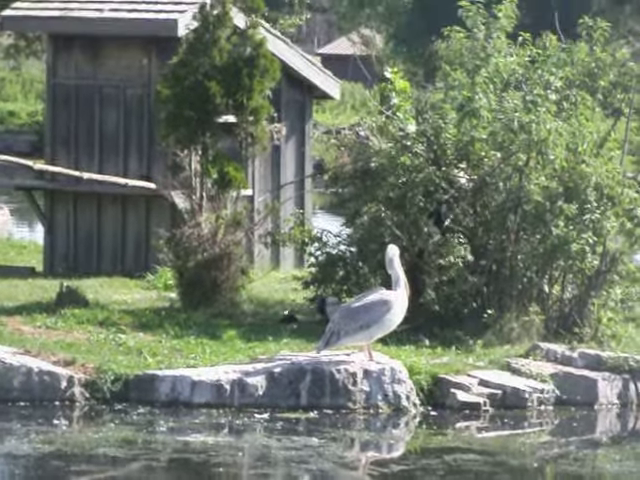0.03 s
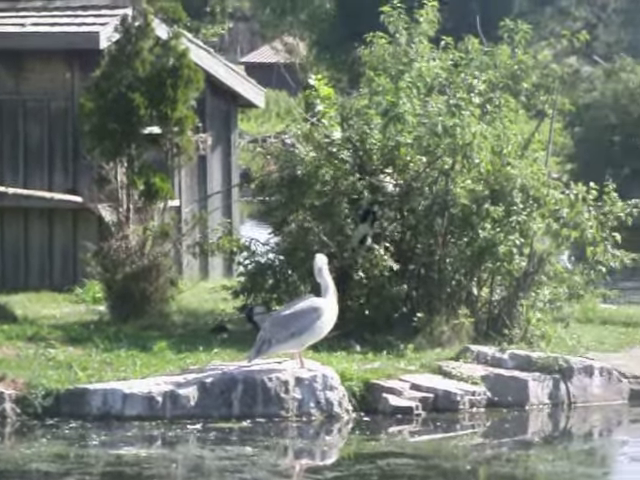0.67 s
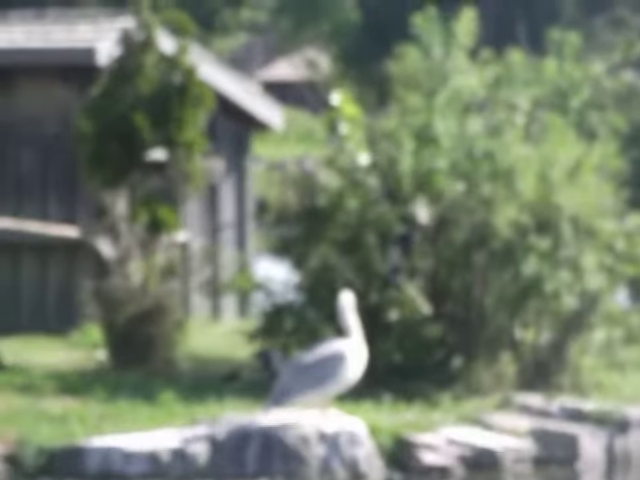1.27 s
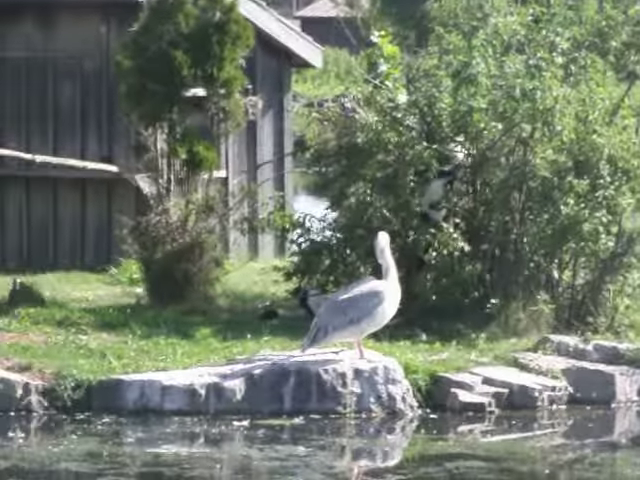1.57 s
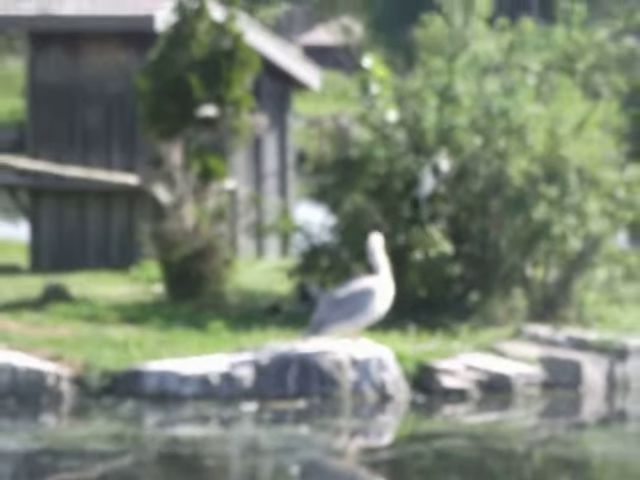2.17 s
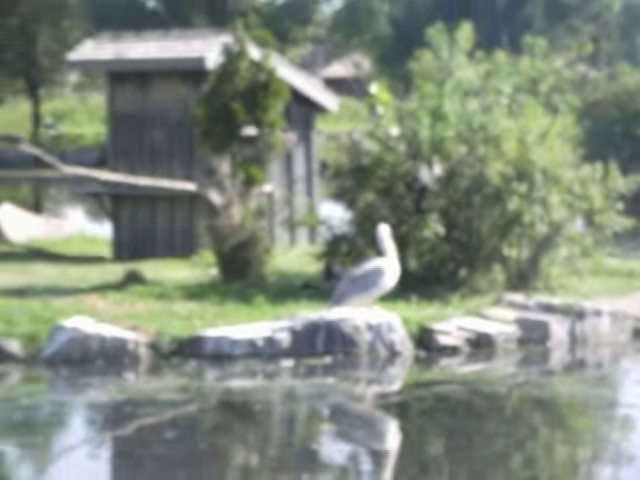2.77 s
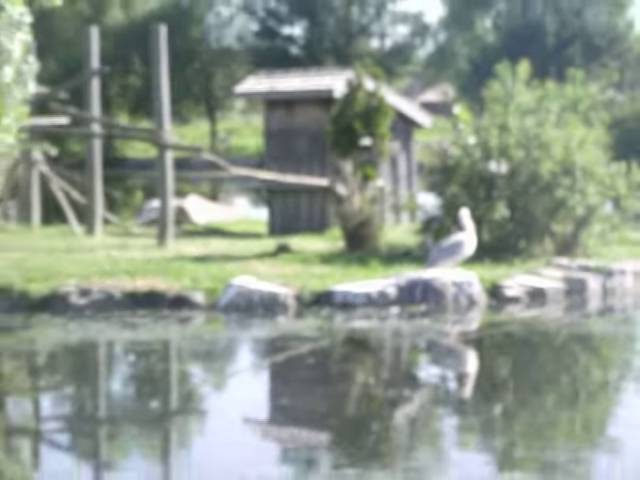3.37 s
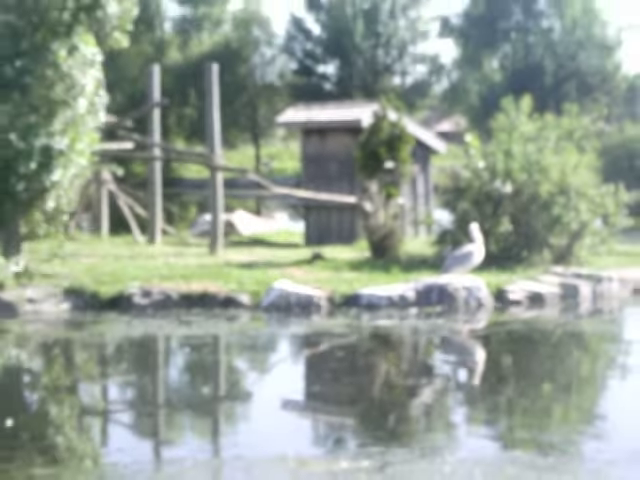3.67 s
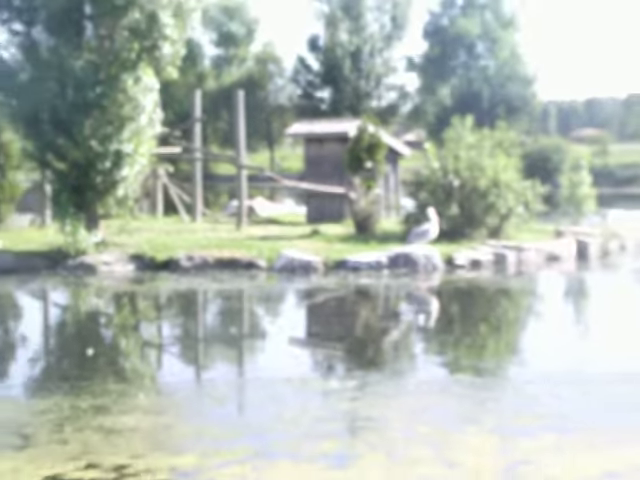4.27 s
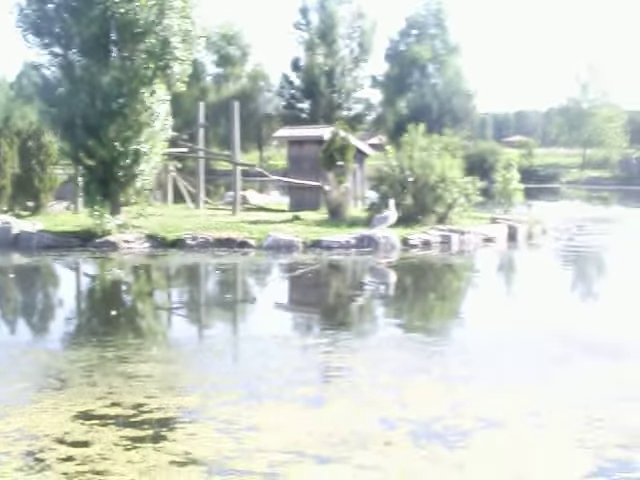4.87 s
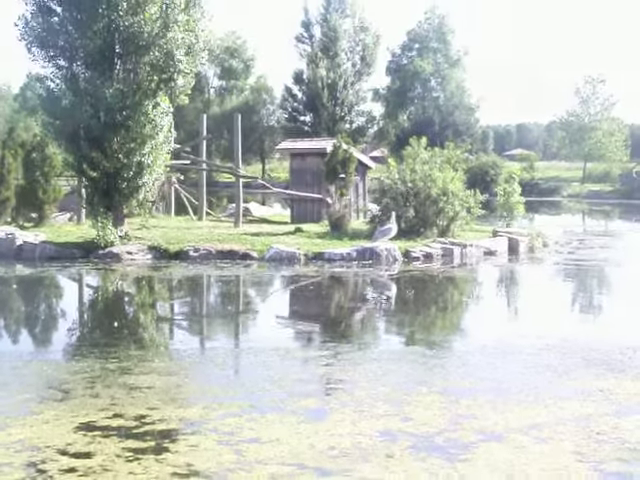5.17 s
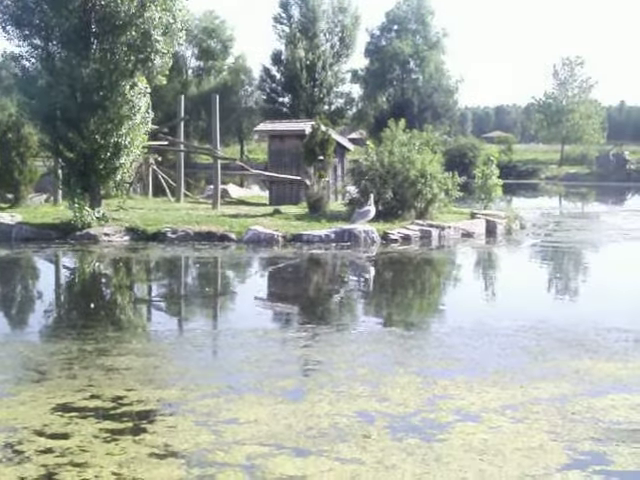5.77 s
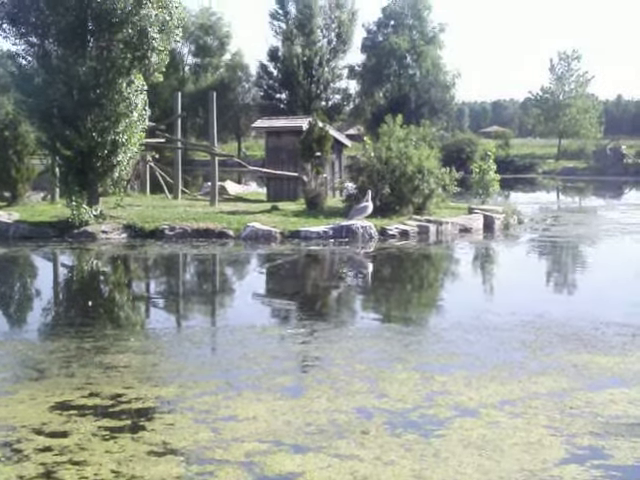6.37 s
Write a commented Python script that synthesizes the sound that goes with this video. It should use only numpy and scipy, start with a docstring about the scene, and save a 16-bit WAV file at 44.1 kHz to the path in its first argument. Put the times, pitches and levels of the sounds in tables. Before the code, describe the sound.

A tiny zoom motor buzzes right by the built-in microphone of a hand-held camera, first in a short burst between clicks, then in a longer, rising run of scraping gears with some dull knocks. Two sharp clacks and a quick squeak come after it stops, and two faint chirps sound far off. Low hum, gentle hiss and light finger noises continue throughout in the quiet outdoor setting.

```python
"""Beside a quiet pond, on the built-in microphone of a hand-held camera, which hears its own body.
A low throbbing hum, soft hiss and small handling ticks lie under everything. At 1 s the lever clicks
and the lens zooms in briefly: each motor step jerks the gears, knocks the case and ends in a scrape.
From 1.8 s it zooms all the way out, whirring louder, with a few dull knocks and at last a thin whine.
Near 4.7 s it stops; two clacks and a squeak follow, then two faint chirps far off."""
import sys
import numpy as np
from scipy import signal
from scipy.fft import rfft, irfft
from scipy.io import wavfile

SR = 44100
rng = np.random.default_rng(int(sys.argv[2]) if len(sys.argv) > 2 else 0)


def master(y):
    """Save y as 16-bit WAV."""
    cut = np.clip(np.atleast_2d(y).T, -1, 1)
    pcm = np.round(cut * 32767)  # scale
    wavfile.write(sys.argv[1], SR, pcm.astype(np.int16))


N = 287091
TIME = np.arange(N) / SR
ZOOM_IN_S, ZOOM_OUT_S = (0.99, 1.27), (1.81, 4.66)  # the motor's start and stop
LAST_STRETCH_S = 4.16


def zoom_motor(span, load, cruise_hz, glide_hz, slide_s, grit, flutter_db, scrape_db, rasp_db,
               knock_spread_db=1, scrape_spread_db=3, reach=0.296):
    """A stepping motor and gears, right by the microphone: each step knocks, scrapes and rasps."""
    # surges of the motor: (start [s], length [s], extra step rate [Hz])
    surges = [(1.12, 0.071, 12.4), (1.87, 0.098, 20.4), (1.99, 0.39, 26.7), (2.71, .17, 27),
              (2.93, .11, 15.6), (3.36, .11, 19), (3.64, .08, 21.3), (3.89, 0.091, 10.9), (4.01, .16, 26),
              (4.17, .15, 26.7), (4.34, 0.091, 18.8), (4.45, 0.093, 23), (4.57, .14, 28)]
    # spectra of the three gear sounds, through the case: (frequency [Hz], gain [dB])
    knock_spectrum = [(250, -55.5), (500, -36.5), (730, -27), (898, -16), (960, -17.5), (1025, -12),
                      (1130, -17), (1291, -1.5), (1375, -1.5), (1500, 2), (1600, -2.5), (1690, -5),
                      (1860, -7.5), (3200, -48.5)]
    scrape_spectrum = [(1200, -19), (1950, 1.5), (2130, -5.5), (2330, -3), (3080, -6), (3300, -19),
                       (3650, -11.5), (4020, 3), (4350, -6.5), (5600, -20.5)]
    rasp_spectrum = [(1200, -32), (2100, -21.5), (2450, -5), (2720, -4), (2930, 6.5), (3080, -0.5),
                     (3280, -13.5), (3480, -16.5), (3680, -25), (4020, -14.5), (4400, -24.5), (5000, -26.5),
                     (5700, -33.5)]
    creep_hz_per_s, surge_db_per_hz = 2.2, 0.0457
    seated_s, seating_s, slack_s = 2.444, 0.16, 0.00012
    running = (TIME > span[0]) & (TIME < span[1])
    surge_hz = humps(surges, taper=0.7)
    step_hz = cruise_hz + creep_hz_per_s * (TIME - span[0]) + surge_hz
    steps = np.cumsum(step_hz * running) / SR
    # the gears pull in with play: rasping and uneven until they seat
    loose = np.clip((seated_s - TIME) / seating_s, 0, 1)
    # the pinion runs off centre: teeth that knock softly slide farther and chirp higher
    last_stretch = TIME > LAST_STRETCH_S
    wobble = np.cos(2 * np.pi * steps / np.where(last_stretch, 2, 3))  # once in two or three steps
    wobble_db = np.where(last_stretch, 3, 1) * wobble
    knocks, scrapes = np.zeros((2, N))
    for k, i in enumerate(np.flatnonzero(np.diff(np.floor(steps)))):
        late, hardness, friction, pitch = rng.standard_normal(4)
        s = TIME[i] + slack_s * (1 + loose[i]) * late
        way = (-1) ** k  # the jerks alternate, so the buzz has odd harmonics of half the step rate
        add(knocks, s, way * amp([knock_spread_db * np.tanh(hardness) - wobble_db[i]]))
        travel = 1 + reach * wobble[i] + 0.03 * pitch
        tooth_slide = glide(glide_hz[0], glide_hz[1] * travel, slide_s * travel)
        add(scrapes, s, way * amp(scrape_spread_db * friction + 2.5 * wobble[i]) * tooth_slide)
    contact = np.exp(-(steps % 1) / 0.5)
    knocks = unit(knocks) + grit * unit(contact * running * rng.standard_normal(N))
    flutter = amp(flutter_db * drift(60) + 1.3 * wobble)
    rasp = (contact + 0.41) * running * flutter * rng.standard_normal(N)
    load_db = np.interp(TIME, *np.transpose(load)) + surge_db_per_hz * surge_hz
    layers = [(colour(knocks, knock_spectrum), load_db),
              (colour(scrapes, scrape_spectrum), scrape_db + 0.89 * load_db),
              (colour(rasp, rasp_spectrum), rasp_db + 6 * loose)]
    return sum(amp(db) * x / np.std(x[running]) for x, db in layers)


def whine(hz=3226, db=-34, fade_db_per_s=22):
    """A thin tone that sets in on the last stretch and fades until the motor stops."""
    gate = humps([(LAST_STRETCH_S, ZOOM_OUT_S[1] - LAST_STRETCH_S, 1)], taper=0.1)
    level = amp(db - fade_db_per_s * np.maximum(TIME - LAST_STRETCH_S, 0))
    return gate * level * np.sqrt(2) * np.sin(2 * np.pi * hz * TIME)


def clacks_and_taps(touch_gap_s=0.0048, bounce_gap_s=0.0052):
    """Lever and lens clack, with three growing touches before and four fading bounces; the case is tapped."""
    # clacks: (time [s], level [dB], brightness [dB], body [dB], rattle [s], lead-in [dB], bounce [dB])
    clacks = [(.967, 5.5, 4.5, -11, 0.0029, -8.5, -36), (1.789, -3.5, 4.5, 1, 0.0032, -3.5, -11),
              (4.7451, 4.5, 7.5, -11, 0.00072, -21, -10), (4.9423, 5.5, -4, 20, 0.00066, -46, -32)]
    # light taps: (time [s], level [dB], brightness [dB])
    taps = [(.164, -9, 8.5), (.386, -20, -1.5), (.506, -18, 18), (0.52, -8.5, 10.5), (.552, -20, 13),
            (1.2845, -6.5, 13), (1.345, -16.5, -9), (5.936, -21, -2), (6.118, -22, -8)]
    # the small case radiates little bass: (frequency [Hz], gain [dB])
    radiation = [(150, -6.5), (500, -10), (850, -6), (1300, 0.5), (5200, -2.5), (6500, -6)]
    out = np.zeros(N)
    for s, db, bright_db in taps:
        add(out, s, click(db, bright_db, body_db=-6, rattle_s=0.0009))
    for s, db, bright_db, body_db, rattle_s, lead_db, bounce_db in clacks:
        add(out, s, click(db, bright_db, body_db, rattle_s))
        for k in range(3):
            touch = click(db + lead_db - 6 * k, bright_db - 6 * k, body_db, rattle_s)
            add(out, s - (k + 1) * touch_gap_s, touch)
        for k in range(4):
            bounce = click(db + bounce_db - 1.4 * k, bright_db, body_db, rattle_s=0.0039)
            add(out, s + (k + 1) * bounce_gap_s, bounce)
    return colour(out, radiation)


def click(db, bright_db, body_db, rattle_s, chatter=0.63, size=900):
    """A blow and a brief rattle ring the case and crack dryly, the more the harder the blow."""
    force = chatter * rng.standard_normal(size) * np.exp(-TIME[:size] / rattle_s) / np.sqrt(SR / 2000)
    force[0] += 1  # the blow itself
    ring = signal.fftconvolve(force, case_ring(bright_db, body_db))
    crack = signal.lfilter(*signal.butter(3, (1812, 3000), "bandpass", fs=SR), force)
    add(ring, 0, amp(-9 + bright_db / 2) * abs(ring).max() * crack / abs(crack).max())
    return amp(db) * ring / abs(ring).max()


def case_ring(bright_db, body_db):
    """The case's answer to one blow; hard blows are brief and favour the high modes, dull ones the low."""
    # modes of the case: (frequency [Hz], level [dB], time to fall 60 dB [s])
    modes = [(332, -33.5, 0.01), (790, -21, 0.0091), (1025, -13, 0.0066), (1366, -3.5, 0.017),
             (1464, 5, .016), (1644, -5.5, 0.013), (2610, -7, 0.0091), (2885, -0.5, 0.012),
             (3273, -14.5, 0.013), (3820, -9.5, .005), (5320, -10.5, .003)]
    t = TIME[:1800]
    contact_s = 0.00013 * amp(-bright_db / 3)
    ring = np.zeros(len(t))
    for hz, db, t60 in modes:
        struck_db = db + bright_db * (hz > 2000) + body_db * (hz < 1200)
        ring += amp(struck_db - 60 * t / t60) * np.cos(2 * np.pi * hz * t)
    return ring * (1 - np.exp(-(t / contact_s) ** 2 / 2))


def thuds(end_hz=513, length_s=0.006, fade_db=16):
    """Dull knocks as the lens travels, dropping in pitch as they die."""
    # knocks: (time [s], peak level [dB], starting pitch [Hz])
    knocks = [(1.804, -21, 1215), (2.765, -19.5, 1400), (2.927, -17, 1400), (2.999, -10.5, 1703),
              (3.057, -22.5, 1000), (3.1168, -11.5, 1510), (3.18, -4, 1903)]
    out = np.zeros(N)
    for s, db, hz in knocks:
        fall = glide(hz, end_hz, length_s)
        fall *= amp(np.linspace(0, -fade_db, len(fall)))
        add(out, s, amp(db) * fall / abs(fall).max())
    return out


def chirps():
    """Quick squeaks, then far chirps: pure gliding tones that swell and fade."""
    # tones: (start [s], length [s], starting pitch [Hz], final pitch [Hz], level [dB])
    tones = [(4.979, .022, 4430, 2380, -22), (4.997, 0.0098, 2450, 2050, -26.5),
             (5.004, 0.0077, 2530, 3620, -17.5), (5.581, 0.11, 2400, 2340, -37.5),
             (5.719, 0.11, 667, 635, -44)]
    out = np.zeros(N)
    for s, length, start_hz, end_hz, db in tones:
        hz = np.geomspace(start_hz, end_hz, round(length * SR))
        tone = np.sqrt(2) * np.sin(2 * np.pi * np.cumsum(hz) / SR)
        add(out, s, amp(db) * np.hanning(len(hz)) * tone)
    return out


def handling_ticks(per_s=90, db=-43, spread_db=3):
    """Faint random ticks of the case in the hand."""
    onsets = rng.random(N) < per_s / SR
    blows = onsets * amp(spread_db * np.minimum(rng.exponential(1, N), 2.5))
    return amp(db) * unit(signal.oaconvolve(blows, case_ring(bright_db=-12, body_db=0))[:N])


def finger_rubs(grain_db=3):
    """Fingers slide on the case, close to the microphone: soft grainy swishes."""
    # slides: (start [s], length [s], level [dB])
    slides = [(.01, 0.08, -42), (0.236, 0.048, -41), (0.765, .17, -45), (1.347, 0.11, -40.5),
              (4.834, 0.064, -41)]
    # skin on plastic: (frequency [Hz], gain [dB])
    spectrum = [(500, -19), (1400, -0.5), (2200, -8), (3100, -7.5), (4400, -3.5), (5600, -26)]
    pressure = humps([(s, length, amp(db)) for s, length, db in slides])
    friction = rng.standard_normal(N) * amp(grain_db * drift(150))
    return pressure * unit(colour(friction, spectrum))


def hum(waver_rad=0.3):
    """A low hum that throbs as its close lines beat; the lowest line dips once."""
    # lines of the hum: (frequency [Hz], rms level [dB])
    partials = [(41.2, -29), (50, -40.5), (55, -40), (61, -33), (82, -43.5), (113, -36), (118, -42),
                (206.5, -50), (333.5, -54.5), (4505, -65.5)]
    lines = []
    for hz, db in partials:
        phase = 2 * np.pi * (hz * TIME + rng.random()) + waver_rad * drift(4.1)
        lines.append(np.sqrt(2) * amp(db) * np.sin(phase))
    dip_start_s, dip_length_s, dip_db = 1.95, 0.7, -10
    lines[0] *= amp(humps([(dip_start_s, dip_length_s, dip_db)]))
    return sum(lines)


def rumble(db=-32.5):
    """Deep noise that swells twice."""
    # its spectrum: (frequency [Hz], gain [dB])
    spectrum = [(8, -1.5), (26, 2.5), (60, -7.5), (110, -5.5), (140, -9), (205, -12), (260, -15.5),
                (400, -24), (700, -40.5)]
    # its swells: (start [s], length [s], rise [dB])
    swells = [(1.1, .16, 4.5), (2.47, 0.18, 4)]
    return amp(db + humps(swells)) * unit(colour(rng.standard_normal(N), spectrum))


def hiss(db=-36, flutter_db=0.88):
    """Soft hiss whose level wavers slightly."""
    # its spectrum: (frequency [Hz], gain [dB])
    spectrum = [(210, -32), (350, -17), (480, -9), (644, -7), (708, -12), (795, -4.5), (902, -7.5),
                (1000, -3.5), (1200, -3.5), (1330, -0.5), (2110, -9), (2300, -11), (2550, -3), (3150, -1.5),
                (4320, -24.5), (5620, -53.5), (9500, -120)]
    return amp(db + flutter_db * drift(6.7)) * unit(colour(rng.standard_normal(N), spectrum))


def amp(db):
    """Decibels to gain."""
    return 10 ** (np.asarray(db) / 20)


def unit(x):
    """Scales to rms 1."""
    return x / np.sqrt(np.mean(x ** 2) + 1e-20)


def add(mix, s, sound):
    """Mixes a sound in at time s."""
    part = mix[round(s * SR):][:len(sound)]
    part += sound[:len(part)]


def glide(start_hz, end_hz, length_s):
    """A tiny gliding tone with soft ends."""
    hz = np.linspace(start_hz, end_hz, int(np.ceil(length_s * SR)))
    return np.sin(2 * np.pi * np.cumsum(hz) / SR) * signal.windows.tukey(len(hz), 0.5)


def humps(rows, taper=1):
    """Smooth rises and falls, each with its start, length and height."""
    out = np.zeros(N)
    for s, length, height in rows:
        add(out, s, height * signal.windows.tukey(round(length * SR), taper))
    return out


def drift(hz):
    """Slow random motion of rms 1, up to about hz."""
    rolloff = 1 + (np.fft.rfftfreq(N, 1 / SR) / hz) ** 4
    return unit(irfft(rfft(rng.standard_normal(N)) / rolloff, N))


def colour(x, spectrum, size=8192):
    """Minimum-phase filter with the given spectrum."""
    hz, db = np.transpose(spectrum)
    bin_hz = abs(np.fft.fftfreq(size, 1 / SR))
    log_gain = np.log(amp(np.interp(np.log(bin_hz + 1), np.log(hz + 1), db)))
    ring = np.fft.ifft(np.exp(np.conj(signal.hilbert(log_gain)))).real[:size // 2]
    return signal.oaconvolve(x, ring)[:N]


def low_pass(x, hz):
    """Steep band limit."""
    return signal.oaconvolve(x, signal.firwin(301, hz, window=("kaiser", 9), fs=SR), "same")


def scene():
    """All sources at the one microphone. Zooming in, the scrapes glide downward; zooming out, upward."""
    # load on the gears, one list for each run: (time [s], level [dB])
    loads = [
        [(1.0, -31), (1.028, -26), (1.136, -27.5), (1.15, -26.5), (1.254, -26.5), (1.27, -39)],
        [(1.82, -37), (1.87, -29), (2.34, -29), (2.94, -21.5), (4.16, -21), (4.18, -18), (4.65, -17.5)],
    ]
    zoom_in = zoom_motor(ZOOM_IN_S, loads[0], cruise_hz=202.7, glide_hz=(3060, 2370), slide_s=0.0052,
                         grit=0.3, flutter_db=2.5, scrape_db=-12.5, rasp_db=-35.5)
    zoom_out = zoom_motor(ZOOM_OUT_S, loads[1], cruise_hz=194.2, glide_hz=(1750, 3093), slide_s=0.0028,
                          grit=0.34, flutter_db=2, scrape_db=-8.5, rasp_db=-32.5,
                          knock_spread_db=2.1, scrape_spread_db=1.55, reach=0.1)
    camera = zoom_in + zoom_out + whine() + clacks_and_taps() + thuds()
    handling = handling_ticks() + finger_rubs()
    return (camera + handling + chirps() + hum() + rumble() + hiss())[None]


def record(dry, band_hz=5700, ceiling=0.79, edge_hz=15800):
    """The camera's narrow-band recorder; the loudest clicks overload it and spit treble."""
    clipped = np.clip(low_pass(dry[0], band_hz), -ceiling, ceiling)
    return low_pass(clipped, edge_hz)[None]


dry = scene()
out = record(dry)
master(out)
```